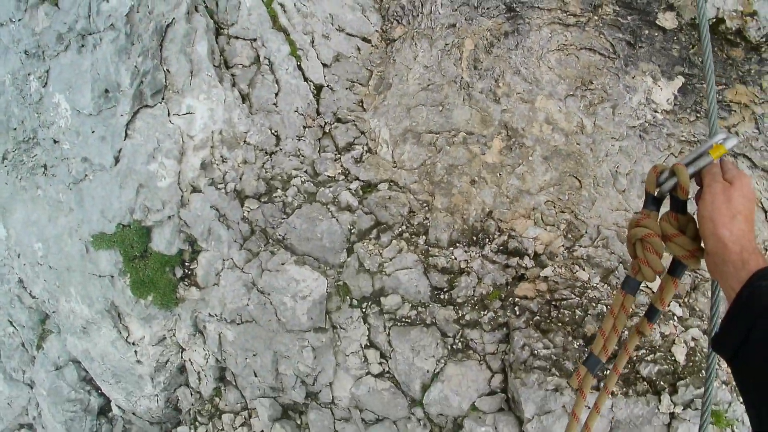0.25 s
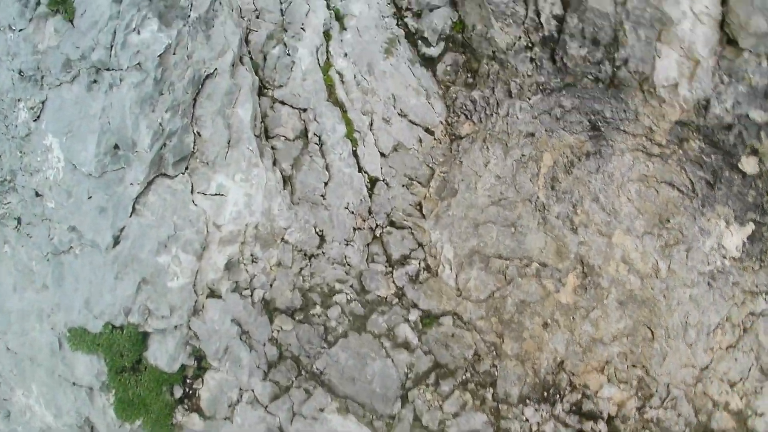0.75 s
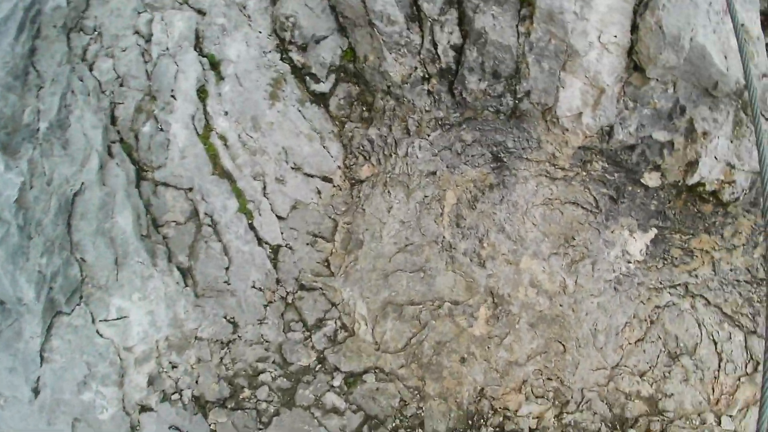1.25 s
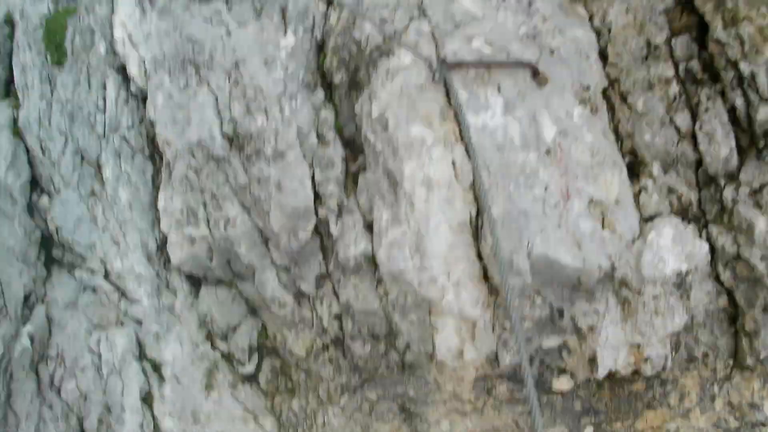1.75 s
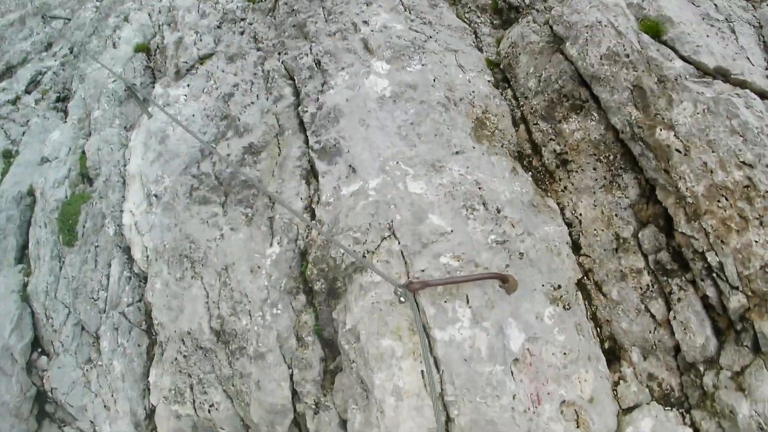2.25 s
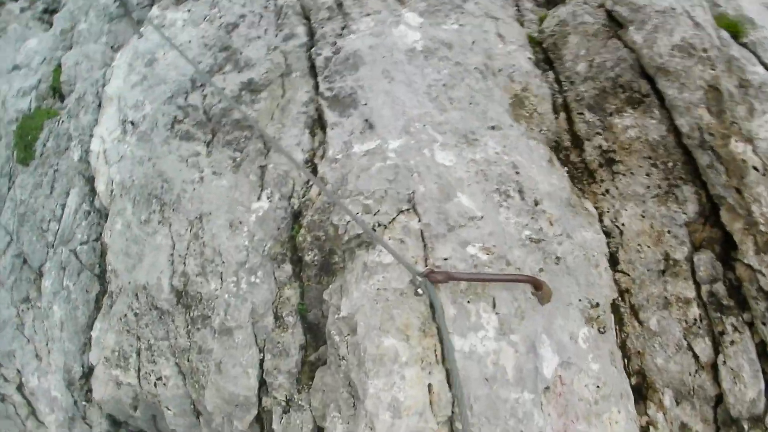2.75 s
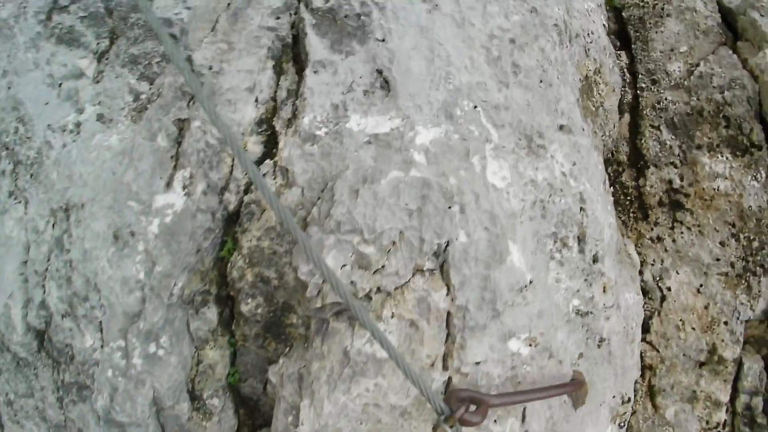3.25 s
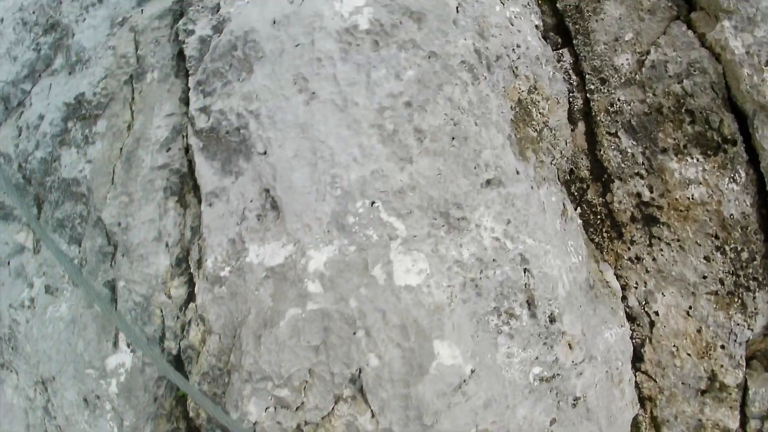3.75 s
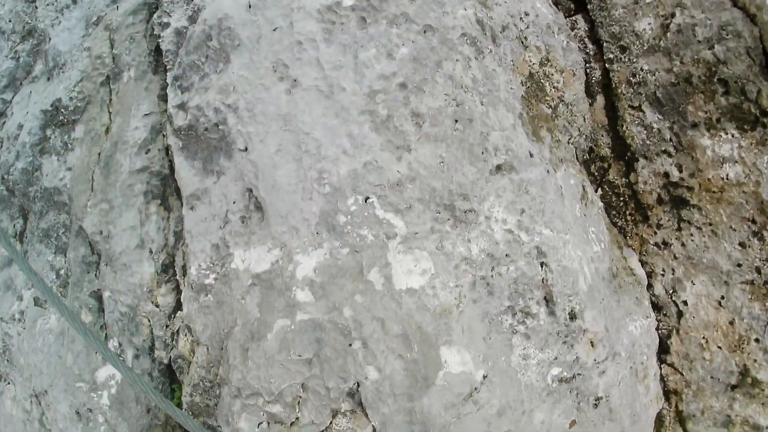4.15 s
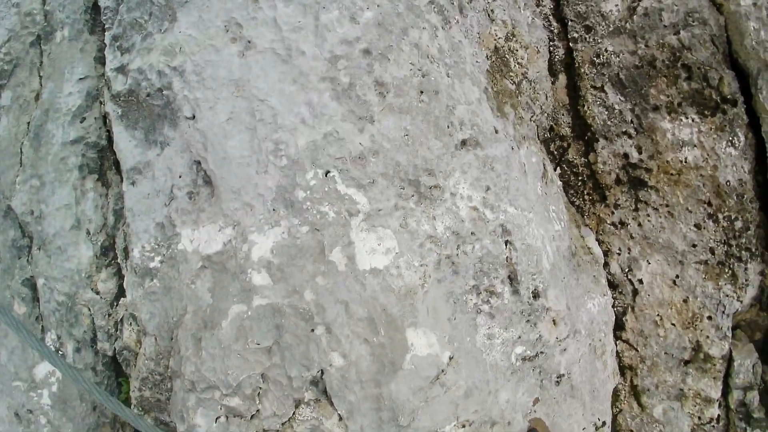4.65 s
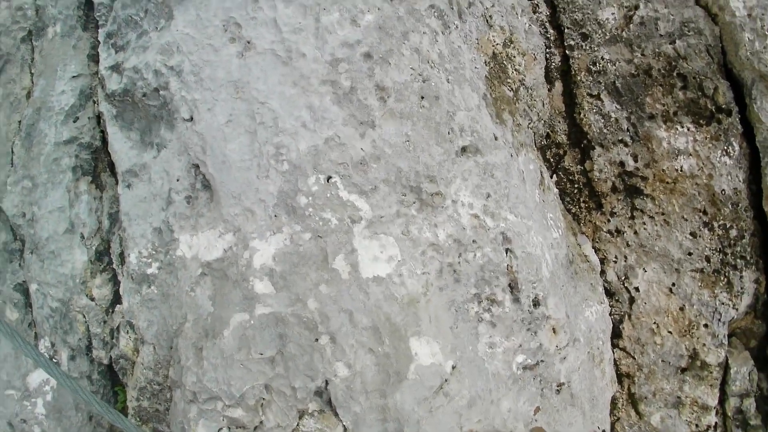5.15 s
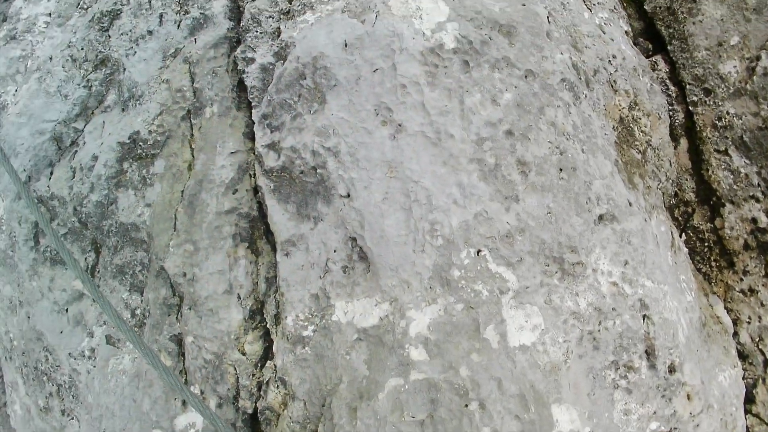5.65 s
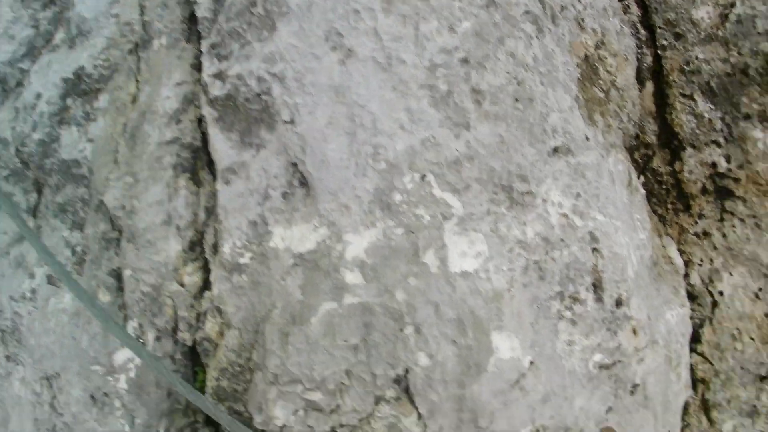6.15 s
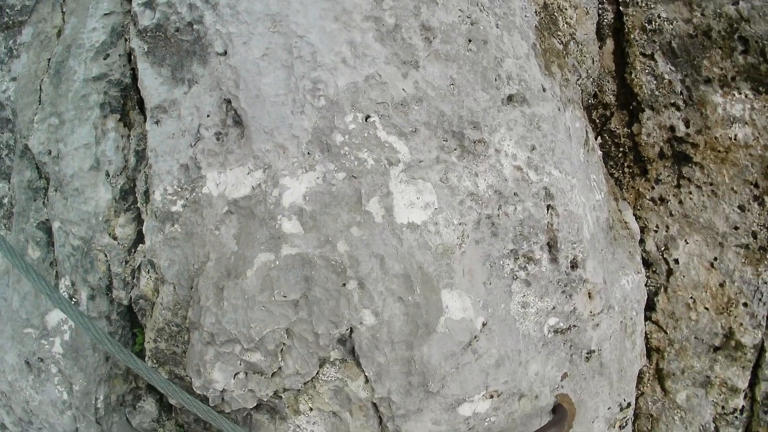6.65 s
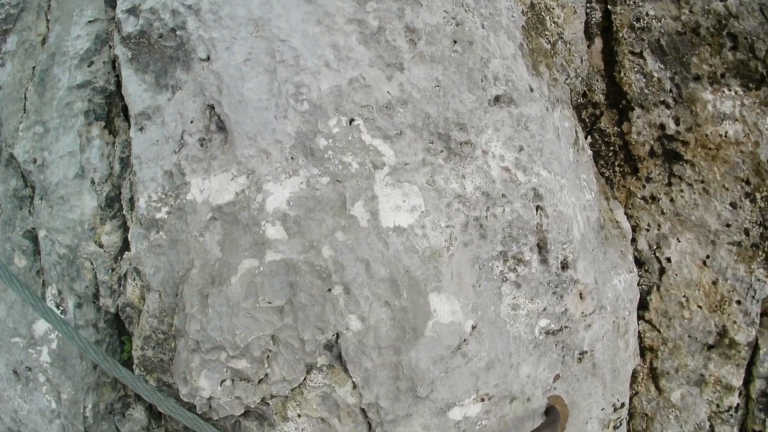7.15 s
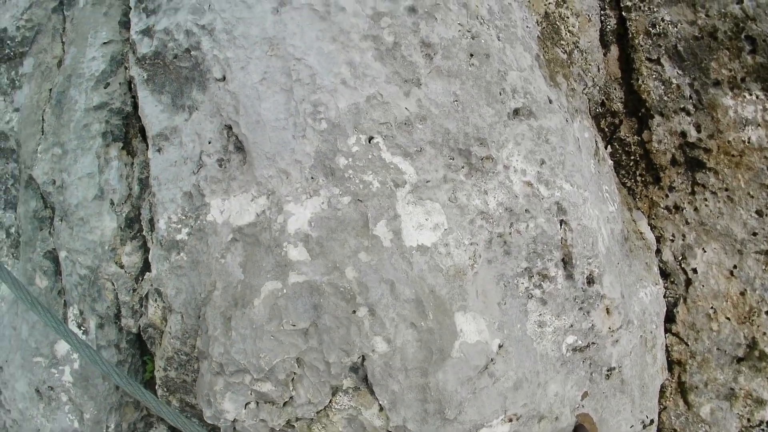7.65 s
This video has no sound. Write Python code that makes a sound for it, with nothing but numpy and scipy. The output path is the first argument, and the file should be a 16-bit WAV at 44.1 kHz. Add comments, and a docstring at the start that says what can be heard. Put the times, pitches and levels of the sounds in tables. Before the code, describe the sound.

Carabiners clink and scrape along a twisted steel cable, with dull bumps and cloth rustle over low wind and faint hiss.

```python
"""Climbing a steel cable

A climber moves up a cable on a rock face, heard close, from a body-worn camera.
Two carabiners clink: noisy bursts of contact ring their modes. Twice they slide along the cable, where
friction noise ticks at each twisted strand and excites cable resonances, with brief squeaks of one mode.
Dull pushes and rubs ring the camera housing, and shaped noise makes the clothes rustle.
Light wind rumbles at the microphone over a faint hiss, and a thin pulsing tone is the electronics."""
import sys
import numpy as np
from scipy import signal
from scipy.fft import rfft, irfft
from scipy.io import wavfile
from scipy.ndimage import uniform_filter1d, map_coordinates

SR = 44100
rng = np.random.default_rng(int(sys.argv[2]) if len(sys.argv) > 2 else 0)


def master(y):
    """Save y as 16-bit WAV."""
    cut = np.clip(np.atleast_2d(y).T, -1, 1)
    pcm = np.round(cut * 32767)  # scale
    wavfile.write(sys.argv[1], SR, pcm.astype(np.int16))


N = 349122

# carabiner touches: (time [s], level before register losses [dB], sparkle over that level [dB],
# favoured ring [Hz])
TOUCHES = [(0.166, -61.5, -4, 3600), (0.201, -53.5, -12, 3660), (0.212, -54, -9, 3620),
           (0.641, -51.5, -8.5, 5340), (0.71, -58.5, -4, 7360), (1.015, -59.5, -13, 3240),
           (1.266, -63.5, -4, 4060), (2.721, -46, -8, 4700), (2.795, -50, -3.5, 7600),
           (3.244, -46.5, -2.5, 3880), (3.321, -53, -6.5, 3250), (3.533, -45.5, -3, 5740),
           (3.629, -57.5, -12, 5860), (3.8093, -58.5, -11, 3300), (3.8775, -49.5, -19, 3330),
           (3.9867, -52.5, -13, 3270), (4.047, -59.5, -20, 2800), (4.19, -49.5, -13.5, 3750),
           (4.801, -52, -13.5, 2300), (4.891, -55, -8, 7240), (4.99, -55, -24, 3600),
           (5.016, -49.5, -13, 4400), (5.02, -50, -1, 2320), (5.043, -47.5, -11, 3400),
           (5.0815, -51.5, -25, 3260), (5.212, -59, -19, 3340), (5.263, -52, -23, 2300),
           (5.313, -51, -17, 3350), (5.349, -40, -19, 3220), (5.9506, -38.5, -13.5, 2260),
           (5.957, -38, -10.5, 2280), (5.9674, -36.5, -7.5, 2000), (5.976, -29.5, -2, 2000),
           (5.9771, -23.5, 2, 4380), (5.983, -38, 4.5, 9150), (5.996, -44.5, 2, 1940),
           (6.4663, -42, -12, 1900), (6.481, -40.5, -4.5, 2370), (6.503, -27, -2.5, 7110),
           (6.509, -37.5, -11, 2070), (6.857, -40, -5.5, 7600), (6.8765, -60, -10, 3700),
           (7.268, -50, -9, 4070), (7.2794, -38.5, -12.5, 2350), (7.4765, -40, -18, 3480),
           (7.635, -54, -20, 3130), (7.668, -47.5, -20, 2300)]

TIME = np.arange(N) / SR
HIT_TIME = np.arange(SR // 5) / SR   # each hit lasts 0.2 s

# metal sound has three registers: body below the first edge, clank between, sparkle above the second
BODY_EDGE_HZ, SPARKLE_EDGE_HZ = 3000, 6500
# decay to -60 dB of the chatter of a touch at the middling level
CHATTER_T60_S, MIDDLING_DB = 0.042, -45


def from_db(db):
    """Amplitude factor of a level in dB."""
    return 10 ** (np.asarray(db) / 20)


def rms_one(x):
    """Scale a signal to rms 1."""
    return x / np.sqrt(np.mean(x ** 2) + 1e-20)


def peak_one(x):
    """Scale a signal so that its loudest 4 ms get rms 1."""
    power = uniform_filter1d(x ** 2, size=SR // 250, mode="constant")
    return x / np.sqrt(power.max() + 1e-20)


def cut(x, hz, kind, order=2):
    """Butterworth filter."""
    sos = signal.butter(order, np.clip(hz, 10, .45 * SR), kind, fs=SR, output="sos")
    return signal.sosfilt(sos, x + 1e-18)


def add(track, s, sound):
    """Mix a sound in at time s."""
    start = round(s * SR)
    track[start:start + len(sound)] += sound[:N - start]


def drift(per_s):
    """Slow random curve of rms 1, through per_s random points a second."""
    knots = rng.standard_normal(size=1000)
    return rms_one(np.interp(TIME * per_s, np.arange(len(knots)), knots))


def coloured(x, spectrum):
    """Filter a signal by a curve of (frequency [Hz], level [dB]) points."""
    hz, db = np.transpose(spectrum)
    bins = np.maximum(np.arange(N // 2 + 1) * SR / N, 1)
    gain = from_db(np.interp(np.log(bins), np.log(hz), db))
    return irfft(rfft(x) * gain, N)


def resonance(x, hz, width):
    """Two-pole resonance, width in Hz, with gain 1 on top."""
    r = np.exp(-np.pi * width / SR)
    zeros = np.array([1, 0, -1]) * (1 - r * r) / 2
    poles = [1, -2 * r * np.cos(2 * np.pi * hz / SR), r * r]
    return signal.lfilter(zeros, poles, x)


def fade(t60):
    """Exponential decay over the length of one hit, by 60 dB in t60 seconds."""
    return from_db(-60 * HIT_TIME / max(t60, .001))


def whistle(hz, width):
    """A wavering tone of rms 1: noise through two narrow resonances."""
    return rms_one(resonance(resonance(rng.standard_normal(N), hz, width), hz, width))


def registers(x, upper_edge_hz, lowest_hz):
    """Split metal sound into body, clank and sparkle."""
    body = cut(cut(x, lowest_hz, "high"), BODY_EDGE_HZ, "low", order=8)
    clank = cut(x, [BODY_EDGE_HZ, upper_edge_hz], "band", order=5)
    sparkle = cut(x, upper_edge_hz, "high", order=8)
    return body, clank, sparkle


def wind(hiss_db=-78):
    """Air rumbles unevenly round the camera, over an even hiss."""
    lumpy_db, lumps_per_s = 1.5, 11
    # wind at the microphone: (frequency [Hz], level [dB per Hz])
    wind_colour = [(8, -75.5), (25, -72.5), (50, -76.5), (100, -83), (200, -91), (300, -89), (500, -95),
                   (750, -96.5), (950, -95), (1300, -102), (2200, -101.5), (3100, -111), (4300, -112),
                   (6000, -120), (14000, -135)]
    noise = rng.standard_normal(N) * np.sqrt(SR / 2)   # 0 dB per Hz
    air = coloured(noise, wind_colour)
    rumble = cut(air, 200, "low", order=1)
    rest = air - rumble
    hiss = from_db(hiss_db) * rng.standard_normal(N)
    return rumble * from_db(lumpy_db * drift(lumps_per_s)) + rest + hiss


def whine(hz=11650, width=130, pulses_per_s=15, level_db=-79):
    """A thin whine of the camera's electronics, pulsing in half sines."""
    gate = np.maximum(np.sin(2 * np.pi * pulses_per_s * TIME), 0)
    return from_db(level_db) * gate * whistle(hz, width)


def clothes(catch_db=3, catches_per_s=40, resting_db=-74):
    """Sleeves and harness rub with small catches; each move swells and settles exponentially."""
    # moves of the climber: (loudest time [s], level [dB], swell time [s], settling time [s])
    moves = [(0.84, -60, 0.06, 0.1), (1.72, -62, 0.21, 0.32), (3.76, -56, 0.11, 0.19),
             (7.74, -58, 0.2, 0.47)]
    # colour of the cloth: (frequency [Hz], relative level [dB])
    cloth = [(100, -22.5), (220, -4), (550, -2), (1300, -10.5), (2200, -11.5), (3200, -23), (8000, -40),
             (15000, -55)]
    catches = from_db(catch_db * drift(catches_per_s))
    rub = rms_one(coloured(rng.standard_normal(N), cloth) * catches)
    motion = from_db(resting_db)
    for s, db, swell_s, settle_s in moves:
        motion = motion + from_db(db) * np.exp(-np.maximum((s - TIME) / swell_s, (TIME - s) / settle_s))
    return motion * rub


def knocks(rub_edge_hz=600, rub_t60_s=0.065):
    """A push and a short rub, which starts with it, set the camera housing ringing."""
    # knocks: (time [s], level [dB], dullness cut-off [Hz], rub noise against push [dB])
    housing_knocks = [(0.802, -44.5, 1600, -8), (0.828, -47.5, 1500, 10), (0.897, -40.5, 1200, -14),
                      (1.358, -29, 810, -31), (1.561, -44.5, 2050, -14), (1.708, -52, 2580, 3),
                      (1.72, -35.5, 1870, -14.5), (2.482, -33.5, 102, -30), (2.508, -44.5, 1240, -17.5),
                      (2.713, -43, 487, 15), (3.643, -20, 2550, -34), (4.049, -42.5, 340, -25)]
    # modes of housing and mount: (frequency [Hz], relative level [dB], decay to -60 dB [s])
    housing_modes = [(78.4, 5, 0.012), (165, 4, 0.012), (315.6, 2.5, 0.043), (500, 8.5, 0.014),
                     (692, -3.5, 0.021), (976, -5, 0.021), (1440, -9.5, 0.018), (1855, -8, 0.018),
                     (2265, -3.5, 0.019)]
    out = np.zeros(N)
    housing = sum(from_db(db) * fade(t60) * np.sin(2 * np.pi * hz * HIT_TIME)
                  for hz, db, t60 in housing_modes)
    for s, db, dull_hz, rub_db in housing_knocks:
        rub = from_db(rub_db) * rng.standard_normal(len(HIT_TIME)) * fade(rub_t60_s)
        force = cut(rub, rub_edge_hz, "high")
        force[0] += 1   # the push
        ring = signal.fftconvolve(force, housing)[:len(HIT_TIME)]
        dull_ring = cut(ring, dull_hz, "low", order=3)
        add(out, s, from_db(db) * peak_one(dull_ring))
    return out


def squeaks(width=90):
    """The sliding contact locks briefly onto one mode."""
    # squeaks: (loudest time [s], time to fall to 1/e [s], frequency [Hz], level [dB])
    locked_modes = [(2.578, 0.018, 3570, -47), (2.639, 0.025, 3640, -47), (2.789, 0.01, 3810, -40),
                    (2.89, 0.018, 3430, -47), (2.984, 0.026, 5830, -48), (3.108, 0.0076, 5760, -50),
                    (3.127, 0.004, 5760, -49), (3.137, 0.0069, 5740, -50), (6.287, 0.025, 5840, -62.5),
                    (6.362, 0.044, 5660, -52.5)]
    return sum(from_db(db) * np.exp(-((TIME - s) / half_s) ** 2) * whistle(hz, width)
               for s, half_s, hz, db in locked_modes)


def wires(x, wires_db, t60=0.18):
    """The cable's many wires ring on: a decaying noise response acts as a dense cluster of modes."""
    ring = rng.standard_normal(len(HIT_TIME)) * fade(t60)
    response = ring / np.linalg.norm(ring)
    return x + from_db(wires_db) * signal.fftconvolve(x, response)[:N]


def anchor_echo(x, near_lag_s=0.00109, far_lag_s=0.0039, lag_wander_s=0.00014):
    """Waves return along the cable from the anchors above and below; wandering lags shift the partials."""
    echo_db, wanders_per_s = -6, 24
    for lag_s in (near_lag_s, far_lag_s):
        lag = lag_s + lag_wander_s * drift(wanders_per_s)
        echo = map_coordinates(x, [(TIME - lag) * SR], order=3)
        x = x + from_db(echo_db) * echo
    return x


def slide(curve, colour, tick_db, tick_decay, ring_db, jitter, uneven_db, snap_db, wires_db, wander_db,
          wanders_per_s=16):
    """Gritty friction snaps and flares at each strand crossed; cable resonances come and go."""
    grit_db, treble_hz, attack_s, release_db_per_s = 4.5, 4500, 0.065, 270
    # sliding speed before jitter: (time [s], strands crossed [per s])
    sliding_speed = [(2.5, 40), (2.58, 109), (2.74, 121), (2.81, 142), (2.97, 120), (3.1, 60), (6.238, 60),
                     (6.304, 61), (6.318, 72), (6.363, 68), (6.383, 47), (6.47, 43)]
    # resonances of cable and carabiner in contact: (frequency [Hz], width [Hz], relative level [dB])
    contact_modes = [(864, 72, 11), (1373, 37, 7.5), (1839, 30, 11.5), (2107, 75, 1.5), (2310, 55, 10.5),
                     (2640, 22, 9.5), (3166, 32, 1), (3835, 50, 3.5), (5660, 120, 4), (7260, 33, -2),
                     (8630, 48, -1)]
    s, *levels_db = np.transpose(curve)
    touching = TIME > s[0]
    speed = touching * np.interp(TIME, *np.transpose(sliding_speed))
    strands = np.cumsum(speed * (1 + jitter * drift(45))) / SR

    # every strand has a strength of its own; its flare dies away before the next
    strand_strengths = from_db(tick_db + uneven_db * rng.standard_normal(size=4000))
    strength = strand_strengths[strands.astype(int)]
    flare = 1 + strength * np.exp(-tick_decay * (strands % 1))
    grit = rng.standard_normal(N) * from_db(grit_db * rng.standard_normal(N))
    friction = touching * grit * flare
    snaps = from_db(snap_db) * strength * np.diff(np.floor(strands), prepend=0)

    rings = np.zeros(N)
    for hz, width, db in contact_modes:
        wander = wander_db * np.tanh(drift(wanders_per_s))
        rings += from_db(db + ring_db + wander) * resonance(friction, hz, width)
    cable = anchor_echo(wires(friction, wires_db) + snaps + 1e-18)
    parts = registers(coloured(cable + rings, colour), treble_hz, lowest_hz=150)

    scrape = sum(from_db(np.interp(TIME, s, db)) * part / part[touching].std()
                 for db, part in zip(levels_db, parts))
    swell = np.clip((TIME - s[0]) / attack_s, 0, 1)
    release = from_db(-release_db_per_s * np.maximum(TIME - s[-1], 0))
    return swell * release * scrape


def short_slide():
    """The later, slower slide: strong, even ticks and steady resonances."""
    # friction: (time [s], middle level [dB], upper middle level [dB], treble level [dB])
    friction_levels = [(6.238, -54, -64, -74), (6.275, -56, -58.5, -67), (6.352, -48.5, -54, -51),
                       (6.426, -49.5, -52.5, -61), (6.46, -45, -50.5, -53)]
    # colour: (frequency [Hz], relative level [dB])
    slide_colour = [(200, -24.5), (500, 5), (950, -9), (1600, -9), (1950, 7), (3100, -5), (3900, -8),
                    (5100, -3), (5650, -12), (6400, -15), (7900, -1), (9800, -21), (12500, 0), (15000, -22)]
    return slide(friction_levels, slide_colour, tick_db=16, tick_decay=5, ring_db=6.5, jitter=.015,
                 uneven_db=1.2, snap_db=14, wires_db=-9, wander_db=2)


def long_slide():
    """The first, faster slide: uneven ticks and widely wandering resonances."""
    # friction: (time [s], middle level [dB], upper middle level [dB], treble level [dB])
    friction_levels = [(2.505, -52, -45, -49), (2.565, -49, -47.5, -49), (2.636, -46.5, -46, -47.5),
                       (2.682, -47.5, -49, -50), (2.712, -50, -45, -44.5), (2.805, -49.5, -49, -43),
                       (2.845, -48.5, -45.5, -49), (2.892, -50, -46.5, -44.5), (2.942, -50, -50, -48),
                       (2.974, -46, -43, -44.5), (3.036, -47.5, -46.5, -53), (3.076, -49, -50, -59),
                       (3.095, -55.5, -56.5, -54)]
    # colour: (frequency [Hz], relative level [dB])
    slide_colour = [(200, -47), (450, -2), (850, -10.5), (1300, -6), (2100, -6), (2900, -7.5), (3700, -5.5),
                    (4800, -7), (5800, -6), (6700, -8.5), (7900, -2), (8800, -8.5), (9700, -14.5),
                    (11500, -16.5), (13400, -7), (15000, -27)]
    return slide(friction_levels, slide_colour, tick_db=11, tick_decay=7, ring_db=3, jitter=.07,
                 uneven_db=2.5, snap_db=19, wires_db=-3, wander_db=9)


def tug():
    """A short tug drags a carabiner over four evenly spaced strands, loudest midway."""
    start_s, step_s, strands = 7.6945, 0.0222, 4
    level_db, swell_db, brightness_db, ring_hz = -42.5, 4, -16, 3000
    swell = np.sin(np.linspace(0, np.pi, strands))
    return [(start_s + k * step_s, level_db + swell_db * swell[k], brightness_db, ring_hz)
            for k in range(strands)]


def lanyard(hz=520, width=170, level_db=-11):
    """Each hop of the tug sends a dull thump down the taut lanyard."""
    out = np.zeros(N)
    for s, db, *_ in tug():
        force = rng.standard_normal(len(HIT_TIME)) * fade(CHATTER_T60_S)
        add(out, s, from_db(db + level_db) * peak_one(resonance(force, hz, width)))
    return out


def jingle():
    """Light, uneven touches of the gear on the harness, shaken by the hardest knock."""
    from_s, to_s, touches = 3.775, 3.98, 7
    level_db, uneven_db, brightness_db = -58, 2, -11
    # favoured rings, taken in turn: (frequency [Hz])
    jingle_rings = (3860, 3340, 5950)
    step_s = (to_s - from_s) / touches
    return [(from_s + (k + late) * step_s, level_db + uneven_db * rng.standard_normal(),
             brightness_db, jingle_rings[k % len(jingle_rings)])
            for k, late in enumerate(rng.random(touches))]


def after_ring(ring_db=-57, t60=0.14, split_hz=40, follows=0.16, scatter_db=3):
    """A touch while the carabiner hangs free leaves a close pair of modes beating and dying away."""
    # hanging free: (start [s], end [s], middle of the ringing pair [Hz])
    hanging_free = [(3.8, 3.9, 3330), (4.78, 5.4, 2295), (7.25, 7.8, 2310)]
    out = np.zeros(N)
    for s, db, *_ in TOUCHES + tug():
        for start, end, hz in hanging_free:
            if start < s < end:
                pair = np.zeros(len(HIT_TIME))
                for side in (-1, 1):
                    mode_hz = hz + side * split_hz * rng.random()
                    pair += np.sin(2 * np.pi * (mode_hz * HIT_TIME + rng.random()))
                level_db = ring_db + follows * (db - MIDDLING_DB) + scatter_db * rng.standard_normal()
                add(out, s, from_db(level_db) * fade(t60) * pair)
    return out


def touch_levels(db, brightness_db, ring_hz):
    """Levels of body, clank and sparkle: body and clank lose level when the favoured ring lies elsewhere."""
    body_loss_db, clank_loss_db = 6, 3.5
    body_db = db - body_loss_db * (ring_hz >= BODY_EDGE_HZ)
    clank_db = db - clank_loss_db * (not BODY_EDGE_HZ <= ring_hz < SPARKLE_EDGE_HZ)
    return body_db, clank_db, db + brightness_db


def clinks(crack_t60=0.0047, chatter_db=-12, direct_db=-14, focus_db=5, focus_width=180, top_hz=14000,
           snap_db=6):
    """A hard crack and the gate's dying chatter ring the carabiner; the contact point favours one pitch."""
    scatter_db, seating_t60 = 2.5, 0.003
    chatter_halves_db = 45   # a light touch chatters longer: this much more level halves the time
    # modes damped by rope and hand: (frequency [Hz], width [Hz], level before scatter [dB])
    carabiner = [(499, 190, -15.5), (980, 140, -13), (2030, 79, -5), (2320, 157, -0.5), (2803, 320, 1.5),
                 (3260, 150, -5.5), (3760, 330, -6.5), (4570, 120, -8), (5740, 350, -15.5),
                 (7410, 1000, -5.5), (8000, 180, -12.5), (8630, 57, -5.5), (9700, 74, -7.5),
                 (11130, 70, -8), (12000, 310, -4), (13200, 310, -6), (13400, 45, -15.5)]
    out = np.zeros(N)
    for s, peak_db, brightness_db, ring_hz in TOUCHES + tug() + jingle():
        chatter_t60 = CHATTER_T60_S * 2 ** ((MIDDLING_DB - peak_db) / chatter_halves_db)
        levels_db = touch_levels(peak_db, brightness_db, ring_hz)
        crack, chatter = rng.standard_normal((2, len(HIT_TIME)))
        force = crack * fade(crack_t60) + from_db(chatter_db) * chatter * fade(chatter_t60)
        force = force * (1 - fade(seating_t60))   # the contact takes a moment to build up
        force[0] += from_db(snap_db)   # after the snap of the first touch

        strengths = from_db(scatter_db * rng.standard_normal(len(carabiner)))
        ring = sum(strength * from_db(db) * resonance(force, hz, width)
                   for strength, (hz, width, db) in zip(strengths, carabiner))
        focus = from_db(focus_db) * resonance(force, ring_hz, focus_width)
        hit = cut(from_db(direct_db) * force + ring + focus, top_hz, "low")
        parts = registers(hit, SPARKLE_EDGE_HZ, lowest_hz=487)
        add(out, s, sum(from_db(db) * peak_one(part) for db, part in zip(levels_db, parts)))
    return out


def scene():
    """Air and camera, the climber's body, and metal on the cable, in one channel."""
    background = wind() + whine()
    body = clothes() + knocks()
    sliding = squeaks() + short_slide() + long_slide()
    touching = lanyard() + after_ring() + clinks()
    return (background + body + sliding + touching)[None]


def record(dry):
    """The top is cut steeply; the converter rests slightly off zero."""
    cutoff_hz, offset = 15900, .0149   # offset as a share of full scale
    top_cut = signal.ellip(10, .3, 70, cutoff_hz, fs=SR, output="sos")   # ripple, stop band [dB]
    return signal.sosfilt(top_cut, dry) + offset


dry = scene()
out = record(dry)
master(out)
```